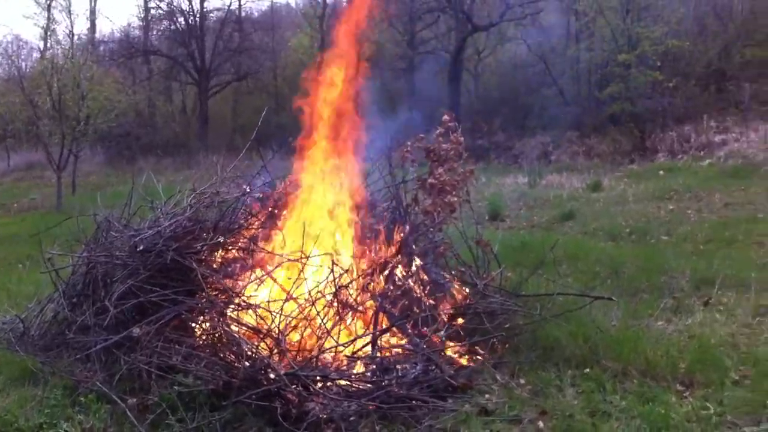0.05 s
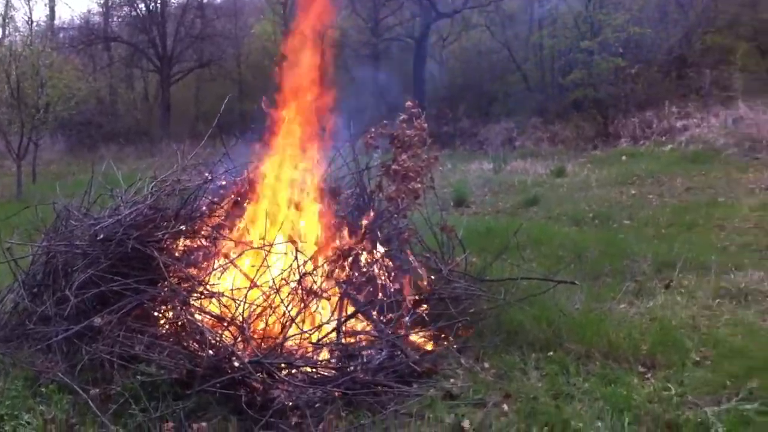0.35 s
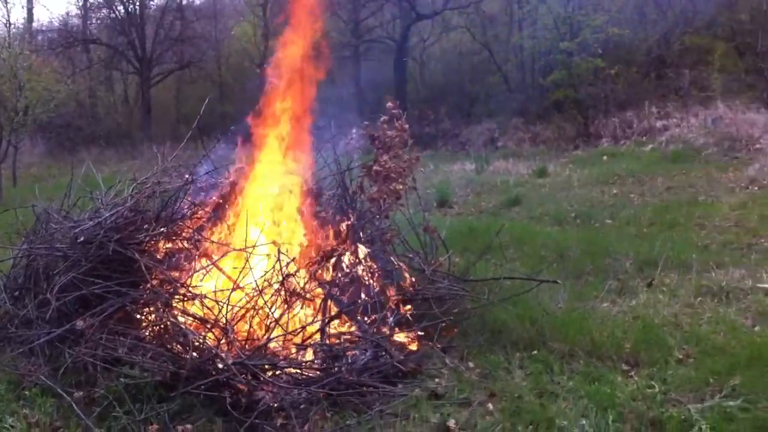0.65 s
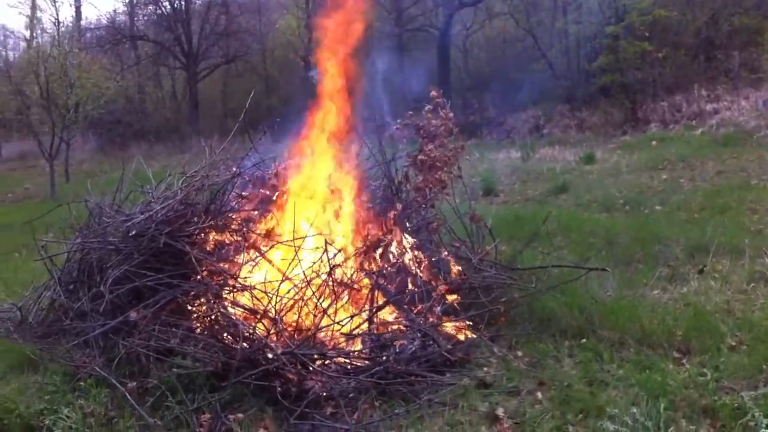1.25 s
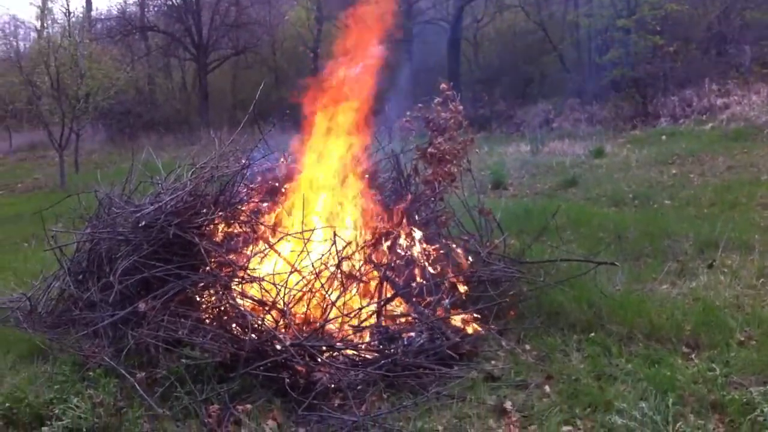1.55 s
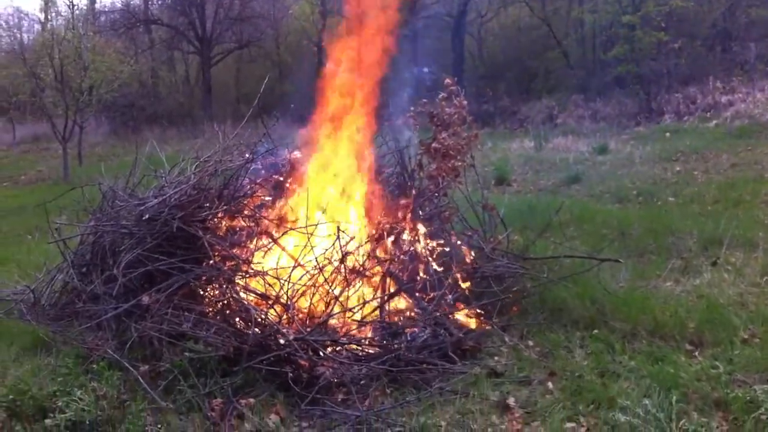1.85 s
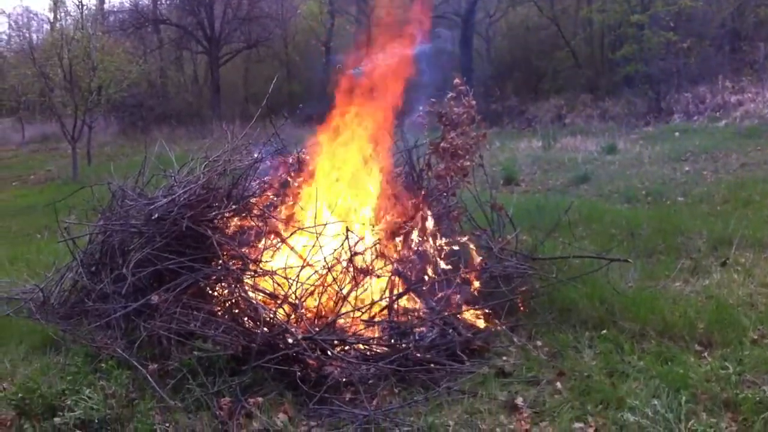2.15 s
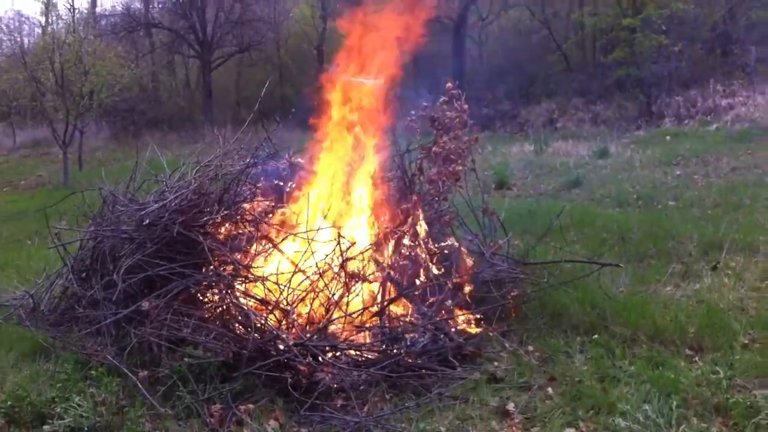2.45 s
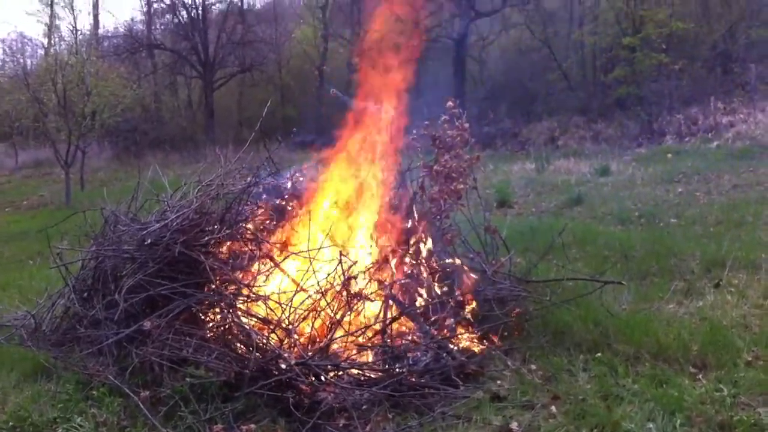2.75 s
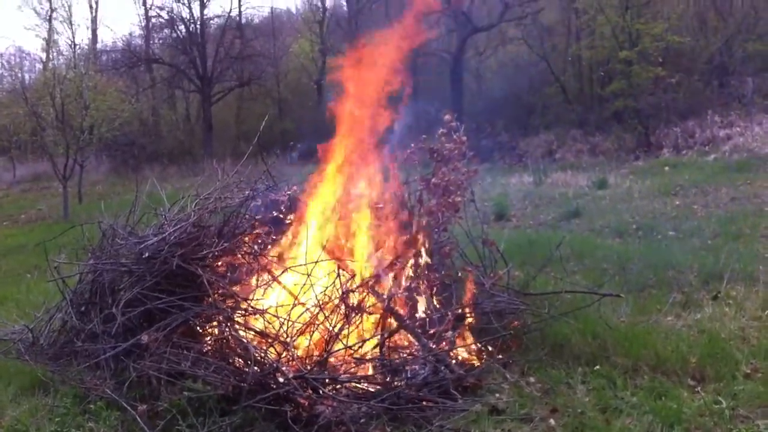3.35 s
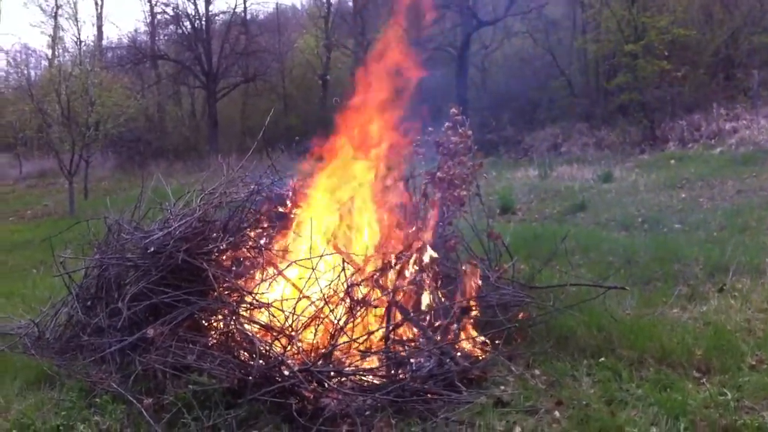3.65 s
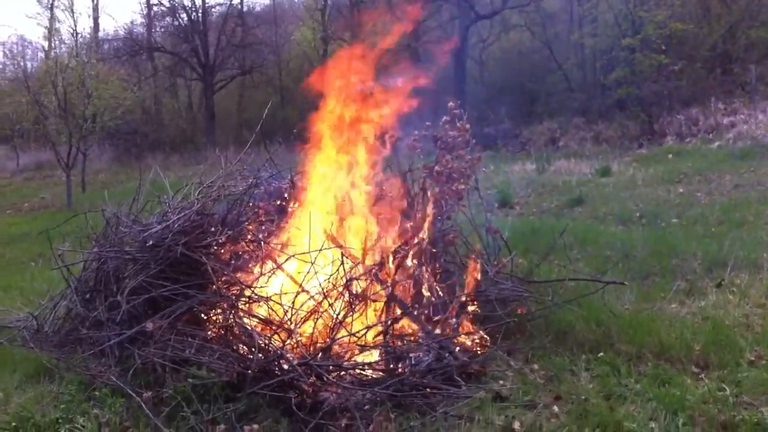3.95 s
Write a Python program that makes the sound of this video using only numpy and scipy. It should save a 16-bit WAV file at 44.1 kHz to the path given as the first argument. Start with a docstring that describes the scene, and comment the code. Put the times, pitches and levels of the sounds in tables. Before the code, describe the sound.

A brush pile burning outdoors, crackling and popping irregularly over a low rumble of flame.

```python
"""A low fluttering rumble with hiss and fine crackle: a brush pile burns in an open field nearby.
Burning gas rumbles and rushes, hot wood hisses and its bark snaps. Twigs burst with sharp pops;
the ground mirrors each snap 1-2 ms later and the tree line returns a faint echo of the pops.
Pockets of gas ignite with low flaps, and steam whistles thinly out of the wood."""
import sys
import numpy as np
from scipy import signal
from scipy.fft import rfft, irfft, next_fast_len
from scipy.io import wavfile
from scipy.ndimage import uniform_filter1d, map_coordinates

SR = 44100
rng = np.random.default_rng(int(sys.argv[2]) if len(sys.argv) > 2 else 0)


def output_pcm(signal):
    """Save a mono or channel-first signal as 16-bit PCM at the path in sys.argv[1].

    Samples are clipped to [-1, 1] before scaling.
    """
    pcm = np.clip(np.atleast_2d(signal).T, -1, 1) * 32767
    wavfile.write(sys.argv[1], SR, np.round(pcm).astype(np.int16))


N = 176400  # 4 s


def amp(db):
    return 10 ** (np.asarray(db) / 20)


def unit_rms(x):
    return x / np.sqrt(np.mean(x ** 2) + 1e-20)


def along(points, hz):
    """Interpolate (f/Hz, value) rows on a log frequency axis."""
    f, value = np.transpose(points)
    return np.interp(np.log(hz + 1), np.log(f + 1), value)


def curve(rows):
    """One value per sample from (t/s, value) rows."""
    return np.interp(np.arange(N) / SR, *np.transpose(rows))


def wobble(rate_hz):
    """Smooth random curve, rate_hz knots a second."""
    knots = rng.standard_normal(int(N * rate_hz / SR) + 4)
    return map_coordinates(knots, [np.arange(N) * rate_hz / SR])


def filtered(x, response):
    """Apply a frequency response, given as a function of Hz."""
    size = next_fast_len(N + SR // 2)
    return irfft(rfft(x, size) * response(np.fft.rfftfreq(size, 1 / SR)), size)[:N]


def noise(spectrum):
    """Noise of rms 1, shaped by (f/Hz, level/dB) rows."""
    return unit_rms(filtered(rng.standard_normal(N), lambda hz: amp(along(spectrum, hz))))


def spiky(size, spread_db):
    """Noise of rms 1 with log-normal sample sizes."""
    grain, spikes = rng.standard_normal((2, size))
    return unit_rms(np.sign(grain) * amp(spread_db * spikes))


def whitened(burst, bins=70):
    """Flatten the broad humps in a burst's spectrum."""
    spectrum = rfft(burst)
    power = uniform_filter1d(np.abs(spectrum) ** 2, bins)
    power = uniform_filter1d(power, bins // 2)
    return irfft(spectrum / np.sqrt(np.abs(power)))


def add(track, start_s, sound):
    """Mix a sound into the track."""
    start = max(0, round(start_s * SR))
    part = track[start:start + len(sound)]
    part += sound[:len(part)]


# Rumble envelope: t/s, level/dB
RUMBLE_LEVEL = [(0, -53.5), (.55, -53.5), (.85, -54.5), (1.3, -54.5), (1.6, -50.5), (1.83, -47.5),
                (2.08, -51), (2.45, -50), (2.53, -54.5), (2.63, -48), (2.78, -53), (3, -47.5), (3.12, -52),
                (3.47, -49.5), (3.6, -52.5), (3.7, -50), (3.85, -51.5), (4, -48.5)]
# Rumble spectrum: f/Hz, relative level/dB
RUMBLE_SPECTRUM = [(20, -26), (40, -32), (62, -19), (95, -8), (130, 2), (190, 1.5), (270, -1), (380, -9),
                   (500, -25), (900, -35), (3000, -90)]


def flame_rumble(flutter_db=2, deep_hz=131, deep_db_per_db=1.45):
    """The flame rumbles and flutters, deeper as it grows."""
    level_db = curve(RUMBLE_LEVEL)
    gas = noise(RUMBLE_SPECTRUM)
    deep = filtered(gas, lambda hz: 1 / (1 + (hz / deep_hz) ** 6))
    deep_gain = amp(deep_db_per_db * (level_db - level_db.mean()))
    return amp(level_db + flutter_db * wobble(22)) * (gas + deep * (deep_gain - 1))


# Rush envelope: t/s, level/dB
RUSH_LEVEL = [(0, -66), (1.2, -65), (1.8, -63), (4, -63)]
# Rush spectrum: f/Hz, relative level/dB
RUSH_SPECTRUM = [(100, -36), (400, -2), (540, -7), (680, 0), (830, 0), (1020, -6.5), (1220, -3),
                 (1550, -17), (2000, -4.5), (4500, -60)]


def gas_rush(gain_db=2):
    """Burning gas gives a soft mid-range rush."""
    return amp(curve(RUSH_LEVEL) + gain_db) * noise(RUSH_SPECTRUM)


# Envelope of hiss and crackle: t/s, level/dB
WOOD_LEVEL = [(0, -63.5), (1.25, -63.5), (1.5, -62), (2.3, -63), (3.5, -60.5), (4, -61.5)]
# Hiss spectrum: f/Hz, relative level/dB
HISS_SPECTRUM = [(300, -49), (1200, -6), (1600, -4), (2000, 3.5), (3000, 2), (5500, 2), (8500, -1),
                 (10500, -3), (13500, 0), (16000, -4)]


def hot_wood(hiss_gain_db=1, waver_db=.5, crackle_gain_db=-2):
    """Hot wood hisses and crackles; both swell together."""
    hiss = amp(hiss_gain_db + waver_db * wobble(28.03)) * noise(HISS_SPECTRUM)
    return amp(curve(WOOD_LEVEL)) * (hiss + amp(crackle_gain_db) * bark_crackle())


def bark_crackle(per_s=150, spread_db=4, decay_s=.0029, low_hz=1830, high_hz=11100, size=512):
    """Tiny snaps of bark, mostly faint, each with its own resonance."""
    out, t = np.zeros(N), np.arange(size) / SR
    for draws in rng.random((int(per_s * N / SR), size + 3)):
        when, rank, pitch = draws[:3]
        burst = (2 * draws[3:] - 1) * np.exp(-t / decay_s)
        twig_hz = low_hz * (high_hz / low_hz) ** pitch
        snap = twig_resonance(burst, twig_hz, treble_db=-2.5)
        level_db = -spread_db * np.log(rank + .053)
        add(out, when * N / SR, amp(level_db) * unit_rms(snap))
    return unit_rms(out)


# Spectrum common to crackle and pops: f/Hz, relative level/dB
BURST_SPECTRUM = [(150, 16), (500, 3.5), (800, 6), (1500, 3.5), (3500, 0.5), (9000, -2.5), (13000, -8.5),
                  (16000, -17.5)]


def twig_resonance(burst, twig_hz, treble_db, peak_db=4.5, width_octaves=.4, fall_db_per_octave=5):
    """A twig colours its burst: one resonant peak, a fall-off below it and a treble shelf."""
    n = len(burst)
    hz = np.fft.rfftfreq(n, 1 / SR)
    octaves = np.log2((hz + 1) / twig_hz)
    resonance_db = peak_db * np.exp(-(octaves / width_octaves) ** 2)
    fall_db = fall_db_per_octave * np.minimum(octaves, 0)
    shelf_db = along([(3000, 0), (10000, treble_db)], hz)
    gain = amp(along(BURST_SPECTRUM, hz) + resonance_db + fall_db + shelf_db)
    # Minimum phase: the ringing follows the burst.
    cepstrum = irfft(np.log(gain))
    cepstrum[1:n // 2] *= 2
    cepstrum[n // 2 + 1:] = 0
    return irfft(rfft(burst) * np.exp(rfft(cepstrum)))


# Bursting twigs: t/s, level/dB, resonance f/Hz, treble/dB
TWIG_BURSTS = [(0.0313, -43.5, 7450, 0), (0.4124, -46.5, 2100, 9.5), (0.594, -54, 2200, -12),
               (0.9002, -54, 1400, 18), (1.239, -53.5, 1680, -25), (1.2853, -54, 3500, 1),
               (1.361, -56.5, 11000, 4.0), (1.3961, -47, 2100, 3), (1.424, -63, 5500, 5),
               (1.4455, -53, 4440, 5), (1.502, -48, 5200, 8), (1.601, -50, 3520, 0), (1.632, -47, 2200, 4),
               (1.7556, -46.5, 3820, -10), (1.829, -29.5, 4400, -3), (2.0859, -46.5, 1780, 3.5),
               (2.4345, -41.5, 10400, -6.5), (2.4657, -40.5, 2120, -10), (2.4854, -35, 5200, 5),
               (2.492, -38.5, 3970, 7), (2.4964, -42, 12000, 13), (2.5108, -36.5, 4100, -8),
               (2.6892, -39.5, 4500, 5.5), (2.711, -38, 2250, 11.5), (2.77, -45.5, 4200, -1),
               (2.8721, -39, 1510, 9), (2.9695, -41.5, 3420, 0), (2.976, -47, 3400, 4),
               (3.2128, -46, 2700, 2.5), (3.295, -47, 13000, -2), (3.31, -47.5, 1400, -3),
               (3.3906, -28.5, 2500, -5), (3.5434, -41.5, 3100, 5.5), (3.632, -46, 1400, 6),
               (3.7096, -47.5, 1850, 14)]


def twig_pops(gain_db=-12.5, snap_s=.0005, ground_gain=.5, size=3072):
    """A twig bursts: a snap and its ground reflection, a ragged crack, a trail of splinters."""
    crack_db, crack_t60_s = -8, .03
    splinter_db, splinter_t60_s = -11, .025
    out, t = np.zeros(N), np.arange(size) / SR
    lead = size // 24
    splinters = amp(splinter_db - 60 * t / splinter_t60_s)
    for start_s, level_db, twig_hz, treble_db in TWIG_BURSTS:
        ground_delay_s = rng.uniform(.001, .002)  # twigs lie at different heights
        snap = np.exp(-(t / snap_s) ** 2)
        reflection = ground_gain * np.exp(-((t - ground_delay_s) / snap_s) ** 2)
        stretch = 2 ** (treble_db / 20)  # bright twigs crack longer
        crack = amp(crack_db - 60 * t / (crack_t60_s * stretch))
        burst = (snap + reflection + crack) * spiky(size, spread_db=2.5)
        burst += splinters * spiky(size, spread_db=9.5)
        burst = whitened(np.pad(burst, (lead, 0)))
        pop = twig_resonance(burst, twig_hz, treble_db)
        add(out, start_s - lead / SR, amp(level_db + gain_db) * unit_rms(pop))
    return out


def tree_echo(x, gain_db=-11.5, t60_s=1):
    """The tree line scatters back a faint diffuse echo, tilted towards the high treble."""
    t = np.arange(SR) / SR
    tail = rng.standard_normal(SR) * amp(-60 * t / t60_s)
    echo = signal.fftconvolve(x, tail / np.linalg.norm(tail))[:N]
    tilt = [(5000, -7.5), (14000, 1.5)]  # f/Hz, level/dB
    return amp(gain_db) * filtered(echo, lambda hz: amp(along(tilt, hz)))


# Igniting gas pockets: centre t/s, level/dB, f/Hz
GAS_POCKETS = [(0.659, -27.5, 300), (0.674, -30, 230), (0.684, -28, 170), (0.736, -37.5, 201),
               (1.688, -37, 316), (1.731, -34.5, 353), (1.737, -36, 202), (1.77, -36.5, 262),
               (1.82, -32, 191), (1.838, -32.5, 323), (1.858, -33.5, 210), (2.213, -33.5, 206),
               (2.355, -33.5, 246), (2.416, -34, 196), (2.451, -29, 174), (2.971, -30.5, 157),
               (2.973, -37, 368), (2.981, -30, 153), (3.033, -30, 157), (3.048, -34, 146),
               (3.194, -30, 173), (3.681, -32, 189), (3.711, -34.5, 184)]


def flame_flaps(gain_db=-1, half_width_cycles=.64, low_cut_hz=82.6, size=2048):
    """Pockets of gas catch fire, each with a low push of a cycle or two."""
    out, t = np.zeros(N), (np.arange(size) - size // 2) / SR
    for centre_s, level_db, hz in GAS_POCKETS:
        envelope = np.exp(-(t * hz / half_width_cycles) ** 2)
        push = envelope * np.cos(2 * np.pi * (hz * t + rng.random()))
        add(out, centre_s + t[0], amp(level_db + gain_db) * push)
    return filtered(out, lambda hz: 1 - np.exp(-(hz / low_cut_hz) ** 2))


# Steam jets: t/s, length/s, start f/Hz, target f/Hz, level/dB, waver/fraction of f
STEAM_JETS = [(1.005, 0.087, 14350, 14300, -68, .014), (1.522, 0.47, 4380, 4250, -68.5, .04),
              (1.63, 0.1, 10680, 10600, -70, .012), (1.84, 0.102, 4460, 4580, -66, .004),
              (3.114, 0.095, 9550, 9800, -60, .013), (3.283, .11, 15300, 13550, -60, .01),
              (3.4, 0.22, 12900, 12830, -65.5, 0.0052)]


def steam_whistles(time_constants=2.8, sputter_db=4.5):
    """Thin sputtering whistles glide and settle as the pressure in a twig changes."""
    out = np.zeros(N)
    for start_s, length_s, start_hz, target_hz, level_db, waver in STEAM_JETS:
        n = int(length_s * SR)
        progress = np.linspace(0, 1, n)
        glide_hz = target_hz + (start_hz - target_hz) * np.exp(-time_constants * progress)
        hz = glide_hz * (1 + waver * wobble(1200)[:n])
        arch = np.abs(np.sin(np.pi * progress)) ** .5
        envelope = arch * amp(level_db + sputter_db * wobble(91)[:n])
        add(out, start_s, envelope * np.sin(2 * np.pi * np.cumsum(hz) / SR))
    return out


def scene():
    """Mono mix of the fire; only the pops echo."""
    pops = twig_pops()
    echo = tree_echo(pops)
    flame = flame_rumble() + gas_rush() + flame_flaps()
    return (pops + echo + flame + steam_whistles() + hot_wood())[None]


def record(dry):
    """Microphone band limit: brick-wall low-pass."""
    return filtered(dry[0], lambda hz: hz < 15850)[None]


dry = scene()
out = record(dry)
output_pcm(out)
```